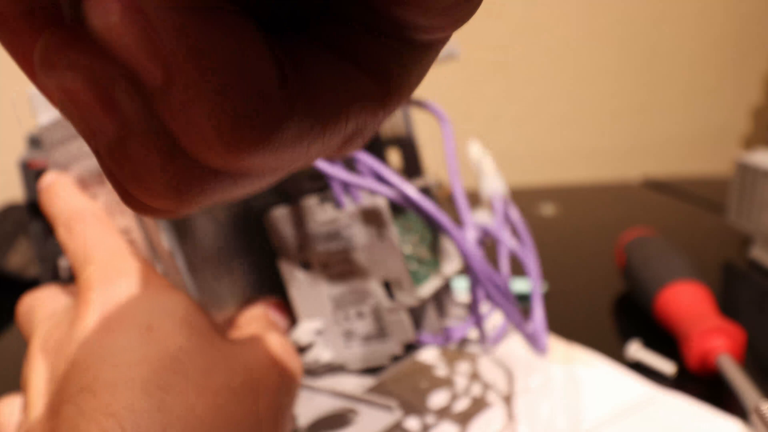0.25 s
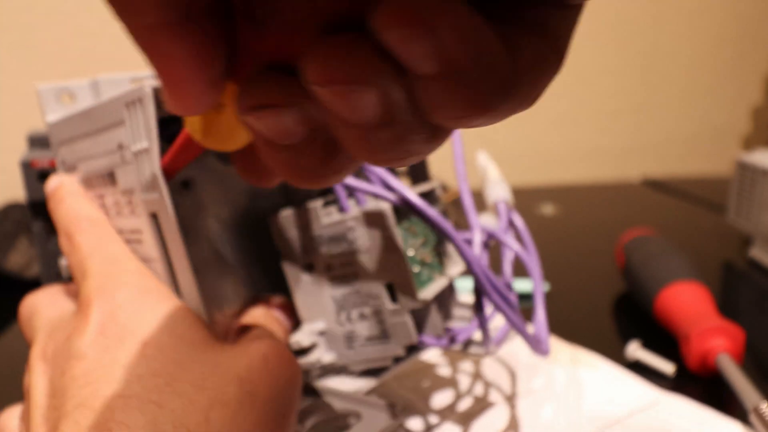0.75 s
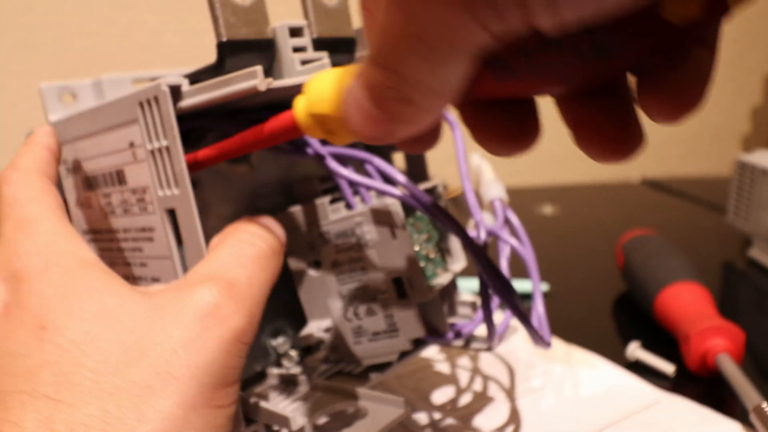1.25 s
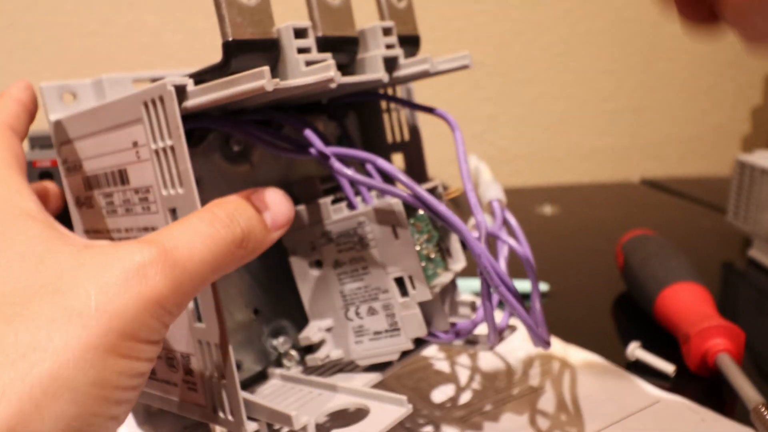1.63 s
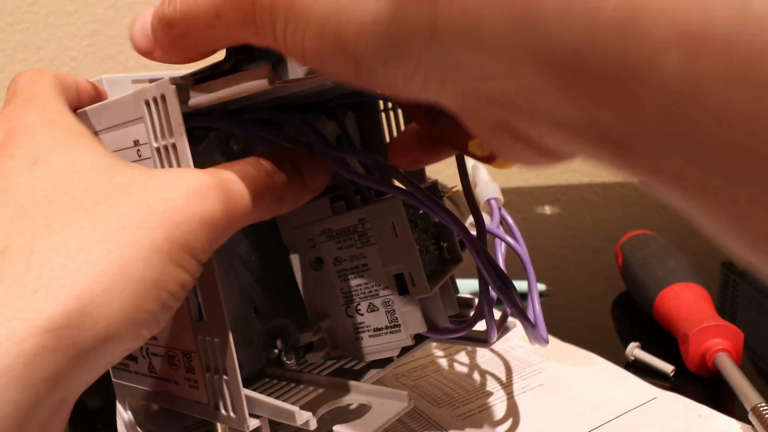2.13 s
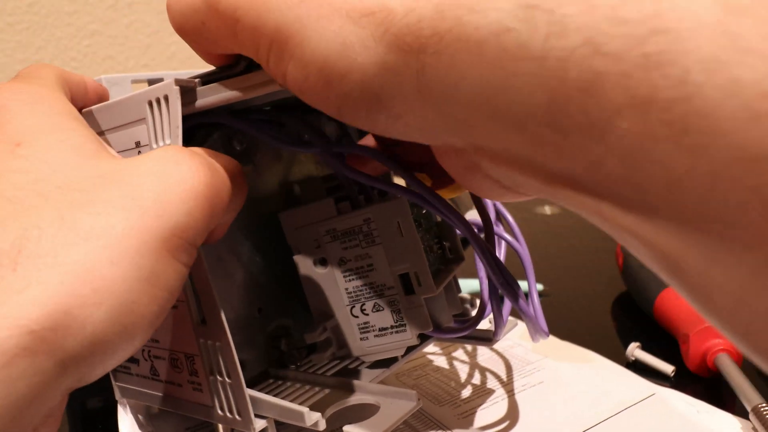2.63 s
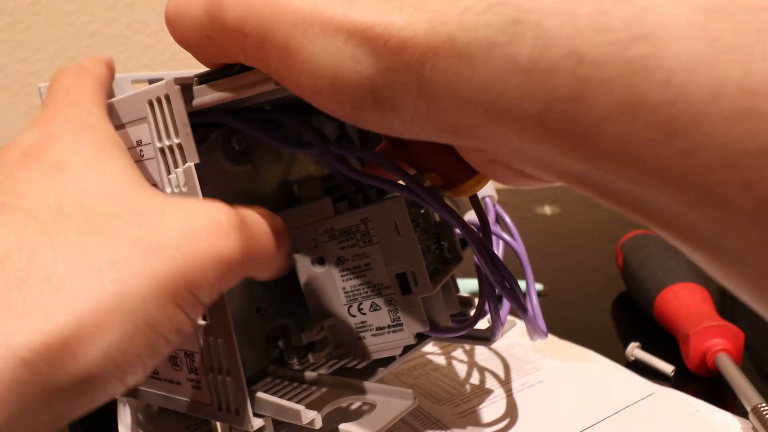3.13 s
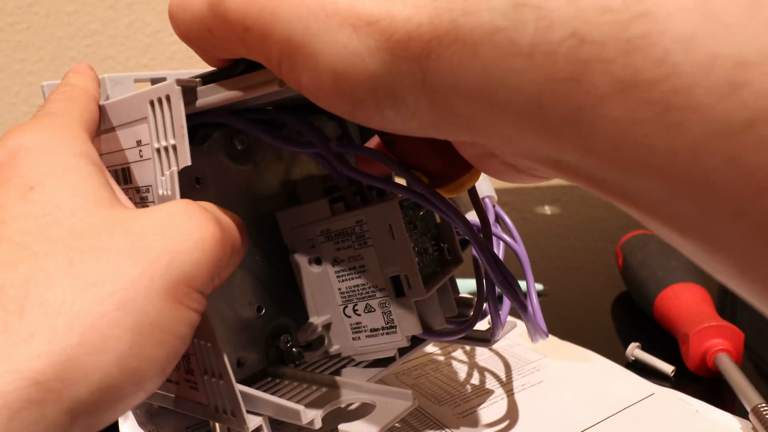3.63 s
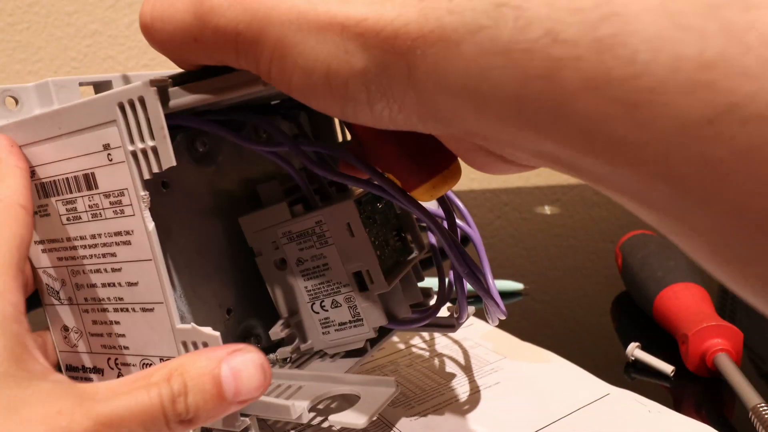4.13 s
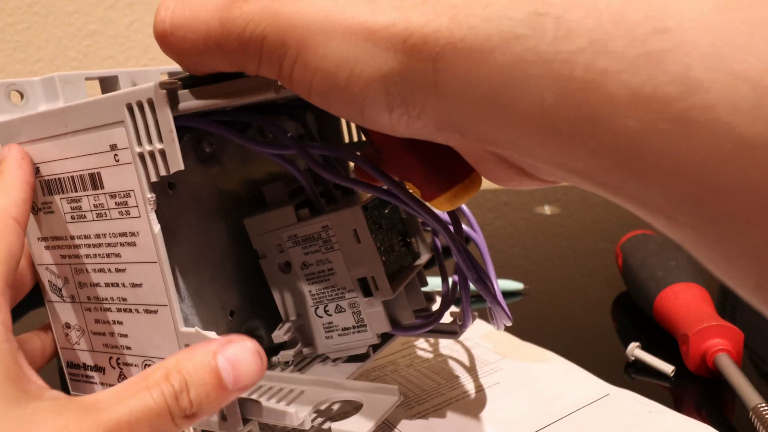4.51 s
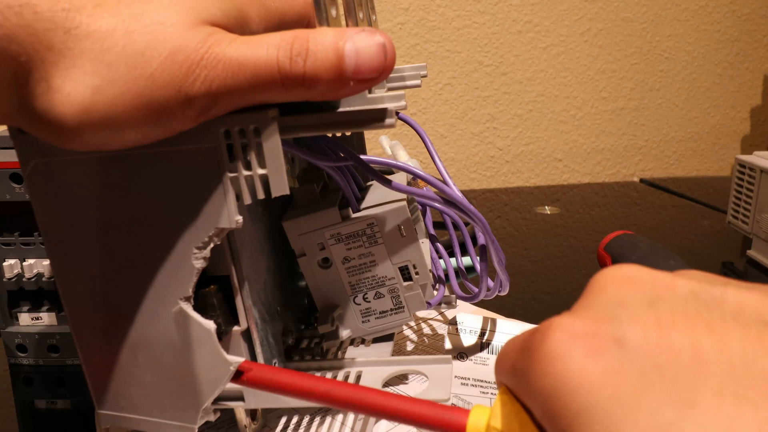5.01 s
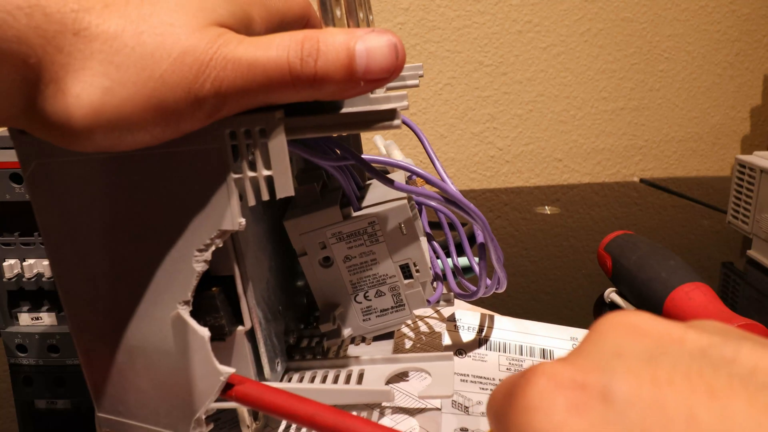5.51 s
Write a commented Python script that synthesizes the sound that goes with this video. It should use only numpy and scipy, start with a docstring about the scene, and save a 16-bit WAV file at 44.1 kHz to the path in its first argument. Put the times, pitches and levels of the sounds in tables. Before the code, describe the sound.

Close clicks and light knocks on a plastic shell, broken by four overloaded snaps, in a small quiet room with faint rumble.

```python
"""A screwdriver pries a hard plastic housing apart on a desk in a small, quiet room.
Snaps and taps are noise sprays coloured by the shell; four snaps overload the microphone and fill the room.
Blows leave panels, desk top and steel shaft ringing as fading modes; hands rub the shell as grainy noise.
Behind them lie the room's echo tail, steady room tone, a wandering bass rumble and a faint hum."""
import sys
import numpy as np
from scipy import signal
from scipy.fft import rfft, irfft
from scipy.io import wavfile
from scipy.ndimage import uniform_filter1d

SR = 44100
rng = np.random.default_rng(int(sys.argv[2]) if len(sys.argv) > 2 else 0)


def to_wav(sig):
    """Store sig (one row per channel, or 1-D mono) as 16-bit WAV at the path in sys.argv[1].

    Samples outside -1..1 are clipped; the rate is SR.
    """
    pcm = np.clip(np.atleast_2d(sig), -1, 1) * 32767
    pcm = np.round(pcm).astype(np.int16)
    wavfile.write(sys.argv[1], SR, pcm.T)  # frames by channels


N = 254016
TIME = np.arange(N) / SR
RESPONSE_HZ = np.arange(1025) * SR / 2048  # frequency grid of the struck sounds


def undb(db):
    """Turns dB into an amplitude factor."""
    return 10 ** (np.asarray(db) / 20)


def unit(x):
    """Scales a signal to an rms of 1."""
    return x / np.sqrt(np.mean(x ** 2))


def on_log(hz, table):
    """Reads a (Hz, value) table along log frequency."""
    table_hz, values = np.transpose(table)
    return np.interp(np.log(np.maximum(hz, 1)), np.log(table_hz), values)


def band(x, lo_hz, hi_hz):
    """Keeps the sound between two frequencies."""
    return signal.sosfilt(signal.butter(2, [lo_hz, hi_hz], "bandpass", fs=SR, output="sos"), x)


def mode(x, hz, width_hz):
    """One resonance, gain 1 at its centre."""
    b, a = signal.iirpeak(hz, hz / width_hz, SR)
    return signal.lfilter(b, a, x)


def walk(rate):
    """Random levels held 1 / rate s and slewed twice."""
    hold = int(SR / rate)
    steps = np.repeat(rng.standard_normal(N // hold + 1), hold)
    return 1.3 * uniform_filter1d(uniform_filter1d(steps, hold), hold)[:N]


def convolve(x, h):
    """Plays x through the impulse response h."""
    return signal.fftconvolve(x, h)[:N]


def response(db):
    """Causal impulse response of a dB spectrum, through the folded cepstrum."""
    cepstrum = irfft(db * np.log(10) / 20)
    half = len(cepstrum) // 2
    cepstrum[1:half] *= 2
    cepstrum[half + 1:] = 0
    return irfft(np.exp(rfft(cepstrum)))


# Damped modes of the plastic shell. Each row: frequency in Hz, width in Hz, lift in dB.
SHELL = [(312, 69, 2.5), (807, 120, 3.5), (1036, 120, 3), (1700, 280, 1), (2270, 82, 0.5), (3776, 120, 5),
         (4270, 73, 4.5), (5450, 400, 2), (6610, 1300, 2.5), (8540, 400, 3), (10200, 170, 2)]


def shell_db(hz):
    """Damped modes of the plastic lift a broad clack."""
    return sum(db / (1 + (2 * (hz - f) / w) ** 2) for f, w, db in SHELL)


# Snaps of the housing, right at the microphone. Each row: start in seconds, peak level in dB,
# then bass, low, middle, high and top levels in dB against that peak, break-up t60 in seconds,
# room share in dB, struck spot in Hz.
SNAPS = [(0.348, 6.5, -20.5, -13, -9.5, -1, 4.5, 0.016, -6, 7098),
         (3.829, 4, -18.5, -4.5, -8.5, 0.5, 2, 0.02, -3.5, 7314),
         (3.868, 7, -22.5, -4.5, -4, 1.5, 4.5, 0.015, -5, 1050),
         (5.7562, 1.5, -28, -8, -2, -1, 4.5, 0.03, -4, 3560)]
# Centres of those five ranges [Hz].
RANGES_HZ = [300, 850, 2000, 4200, 8000]
# Roll-off beyond the outer ranges. Each: frequency in Hz, level in dB against the outer range.
BASS_EDGE = (56, -12)
TOP_EDGE = (16000, -20)
TOUCH_LIFT_DB, TOUCH_Q = 11, 16  # the spot that is struck rings louder than the rest
ROOM_SPOT_SHARE = .3  # the room hears little of the struck spot


def blows(table):
    """Each blow is a fading spray of tiny fractures; returns the direct sound and what the room is fed."""
    t = TIME[:4096]
    near, far = np.zeros(N + 8192), np.zeros(N + 8192)
    for s, peak_db, *range_db, t60, room_db, spot_hz in table:
        density = np.array(range_db) - 10 * np.log10(np.array(RANGES_HZ) / 1000)  # range level to dB per Hz
        points = [(BASS_EDGE[0], density[0] + BASS_EDGE[1]),
                  *zip(RANGES_HZ, density),
                  (TOP_EDGE[0], density[-1] + TOP_EDGE[1])]
        spot_db = TOUCH_LIFT_DB / (1 + (2 * TOUCH_Q * (RESPONSE_HZ / spot_hz - 1)) ** 2)
        broad_db = peak_db + on_log(RESPONSE_HZ, points) + shell_db(RESPONSE_HZ)
        broad_db += 10 * np.log10(t60 * SR)  # a longer spray carries more energy
        clack = response(broad_db + spot_db)
        spray = rng.standard_normal(len(t)) * undb(1.2 * rng.standard_exponential(len(t)))
        spray *= 1000. ** (-t / t60) * np.minimum(t / 0.00032, 1)
        i = min(int(s * SR), N - 1)
        near[i:i + len(t)] += signal.fftconvolve(spray / np.linalg.norm(spray), clack)[:len(t)]
        # summed over all directions the fractures blend into one smooth clack
        far[i:i + len(clack)] += response(broad_db + room_db + ROOM_SPOT_SHARE * spot_db)
    return near[:N], far[:N]


# Taps on the housing. Each row: start in seconds, tick peak in dB, thud peak in dB, tick spot in Hz,
# thud spot in Hz, tick brightness in dB per range, thud brightness in dB per range, room share in dB.
TAPS = [(0.2069, -33.5, -32, 4766, 1600, 0.5, 1.5, 0), (0.2234, -40, -43.5, 4760, 1550, -0.5, 1, -4.5),
        (0.6868, -43.5, -53, 2700, 1130, -2.5, 2, -7), (0.7512, -40.5, -42.5, 2640, 1430, -6.5, -2.5, -3),
        (0.7806, -43, -39.5, 7300, 1010, 1, -2, -2), (0.8001, -42.5, -50.5, 5560, 633, 3, -13, 10.5),
        (0.826, -37.5, -34.5, 7450, 1010, 1, -0.5, -3), (0.8555, -37, -29.5, 3610, 1790, 0, -3.5, -4),
        (0.8749, -23.5, -29, 5340, 756, -3.5, -2, 0.5), (0.8844, -28.5, -27, 5500, 883, -2, 0.5, -3.5),
        (1.1012, -50.5, -63, 4240, 1070, 4.5, 1, 9), (1.1313, -51.5, -57, 3600, 1080, 4, 1, -2),
        (1.1882, -29.5, -58, 3050, 1940, -2.5, 0, -4), (1.2724, -55, -49.5, 3610, 791, 0, -2, -1),
        (1.3503, -44, -45, 3610, 807, 0, 0, 1), (1.4217, -44, -47, 2670, 746, 4, -2.5, 6),
        (1.439, -49, -46, 5770, 794, 2, -2.5, 10.5), (1.4714, -46, -40.5, 2710, 832, 1, -2.5, -1),
        (1.4984, -52, -45, 7190, 826, 5, 6, -1), (1.5157, -41, -46.5, 7540, 805, 3.5, 9, -4),
        (1.5319, -37, -43.5, 3900, 1660, 8.5, 6, -5), (1.8394, -74, -45, 2830, 700, 0, -4.5, 12),
        (1.8694, -75, -42, 2540, 1310, 0, -2.5, 11.5), (2.0474, -62, -46.5, 2820, 931, 0, -1.5, 8),
        (2.1241, -22.5, -31.5, 3680, 939, -2.5, -0.5, 0), (2.1384, -33, -34, 3700, 1100, 0.5, 1.5, 1.5),
        (2.2268, -26.5, -38, 3684, 767, -7, -5.5, 0), (2.3111, -47, -60, 6130, 773, 2, 2, -2),
        (2.38, -29, -36, 3640, 1690, -1, 0.5, -1.5), (2.3984, -40.5, -42, 2960, 627, 4, 4, -4),
        (2.4369, -46, -55, 3630, 762, 6, 3, -8), (2.448, -45, -52, 2910, 1430, 6, -6, -2),
        (2.5047, -32, -52, 7270, 856, 6.5, 3, -7.5), (2.7097, -50, -61, 5200, 1040, 0, -1, 10),
        (2.7218, -46, -55, 5540, 1070, 2.5, 0, -6), (2.7911, -46, -51.5, 3570, 1460, -1, 0.5, 6),
        (2.811, -42.5, -48.5, 2500, 732, 3, 5.5, -4), (2.9123, -49, -46, 2970, 797, 2, -1, 0),
        (2.9614, -32, -39, 2860, 1640, 0.5, -1.5, -1.5), (2.9677, -21.5, -30.5, 2680, 805, 3, 1.5, -1.5),
        (3.0076, -7.5, -37, 5700, 1880, -1, 0, -1.5), (3.0204, -20, -40, 4310, 1650, -0.5, 0.5, -1),
        (3.0854, -33, -47, 4800, 799, 0.5, 0, -2), (3.2296, -33.5, -47, 2730, 794, -4, 0, -1.5),
        (3.2829, -39.5, -51.5, 7050, 872, -0.5, 2.5, -2.5),
        (3.3333, -42.5, -56.5, 4170, 1730, 1.5, 0.5, -1), (3.3528, -45, -52.5, 2940, 1120, 1, 0, -2),
        (3.4176, -46.5, -57.5, 3044, 791, 2.5, 0.5, -1), (3.6192, -48.5, -50, 3030, 1420, -2, 1, -1.5),
        (3.7419, -37.5, -49, 3610, 1550, -0.5, 0.5, -2.5), (3.8984, -13, -18.5, 3704, 1610, 0.5, 0, -3.5),
        (3.9874, -22, -20, 3710, 1250, 6, 0, 8.5), (4.0158, -19.5, -23.5, 4980, 921, 5, -2.5, 2.5),
        (4.0442, -12.5, -28, 3470, 985, 0, -0.5, 2), (4.0724, -18.5, -35, 5870, 980, 1.5, -3, 3),
        (4.607, -51, -54.5, 2510, 657, 0.5, -2.5, 3), (4.6947, -50.5, -69, 5820, 880, 0.5, -2, 1),
        (4.7571, -33, -45, 3700, 794, 2, -2.5, -1.5), (4.7924, -45, -47, 2870, 1240, -6, -7, -12.5),
        (4.8484, -66, -50.5, 3790, 853, 0, 0, -14), (4.8793, -44.5, -64, 3530, 600, -1.5, 0, 2),
        (5.011, -50, -65, 4400, 875, 5.5, 2, 4.5), (5.0439, -42.5, -52, 5330, 2020, 6, 4, 2),
        (5.0544, -41, -50, 5400, 665, 7.5, -3, -4), (5.1248, -50.5, -61, 4370, 633, 0, -3, 2),
        (5.1452, -40.5, -54, 2430, 624, -2.5, -11, -3), (5.2714, -50, -71, 4330, 600, 0, 2, 8.5),
        (5.4251, -36.5, -61.5, 5380, 1080, 0, -1, -1.5), (5.4755, -45.5, -75, 4730, 716, 0.5, 0, -13),
        (5.6834, -51.5, -60.5, 3550, 713, 2, 0, 1), (5.696, -57, -58, 6150, 743, 0, -2.5, 1)]
# Colour of the two parts of a tap, the edge ticks and the body thuds: one level in dB for each range.
TICK_DB = [-22.5, -17.5, -7.5, -1.5, -4]
THUD_DB = [-10.5, -3.5, -1.5, -17, -34.5]
TICK_T60_S, THUD_T60_S = .018, .05
TICK_FALL_DB_PER_OCTAVE = 4  # a tick's colour falls away from its spot
FAINT_PER_S, FAINT_TOP_DB, FAINT_SPREAD_DB = 5.7, -57, 3  # small ticks at random moments


def taps():
    """A tap is a tick plus a thud, given as rows for blows(); faint taps fall at random moments."""
    faint = []
    for when, loudness, pitch in rng.random((int(FAINT_PER_S * N / SR), 3)):
        tick_db = FAINT_TOP_DB + FAINT_SPREAD_DB * np.log(loudness)
        faint.append((when * N / SR, tick_db, FAINT_TOP_DB - 8, 2500 * 3.2 ** pitch, 900, 0, 0, -3))
    rows, step = [], np.arange(5)
    for s, tick_db, thud_db, tick_hz, thud_hz, tick_bright_db, thud_bright_db, room_db in TAPS + faint:
        hump_db = -TICK_FALL_DB_PER_OCTAVE * abs(np.log2(np.array(RANGES_HZ) / tick_hz))
        tick_colour = TICK_DB + hump_db + tick_bright_db * (step - 3)
        thud_colour = THUD_DB + thud_bright_db * (step - 1)
        rows.append((s, tick_db, *tick_colour, TICK_T60_S, room_db, tick_hz))
        rows.append((s, thud_db, *thud_colour, THUD_T60_S, room_db, thud_hz))
    return rows


def ring_modes(strikes, modes, swell_s):
    """Close clusters of modes blur into a rough, fading tone; those near the struck spot sound."""
    t, out = TIME[:SR], np.zeros(N + SR)
    for hz, mode_db, t60 in modes:
        tone = mode(rng.standard_normal(N + SR), hz, 8 + hz / 28)
        fade = 1000. ** (-t / t60) * (1 - np.exp(-t / swell_s))
        for s, spot_hz, reach, db in strikes:
            i = int(s * SR)
            nearness = np.exp(-.5 * (np.log2(hz / spot_hz) / reach) ** 2)
            out[i:i + SR] += undb(db + mode_db) * nearness * fade * unit(tone[i:i + SR])
    return out[:N]


# Blows that leave a panel ringing. Each row: start in seconds, struck spot in Hz, reach in octaves,
# rms level in dB before the fade.
RINGS = [(.352, 1100, .08, -28.5), (.755, 1420, .08, -43), (1.84, 1420, .08, -47), (1.85, 2000, .1, -50),
         (2.503, 7200, .1, -52), (.876, 2260, .08, -40), (1.19, 1950, .08, -50), (1.352, 820, .1, -47.5),
         (1.473, 820, .1, -47), (2.13, 1080, .1, -50), (2.967, 860, .15, -27), (3.832, 1630, .08, -22),
         (3.871, 1000, .15, -27), (3.872, 1750, .3, -21), (3.875, 3620, .1, -24)]
# Modes of the housing panels. Each row: frequency in Hz, level in dB, t60 in seconds.
PANEL = [(820, 0, .12), (1110, 0, .52), (1420, 0, .5), (1630, 0, .25), (1980, 0, .25), (2260, 0, .3),
         (3620, 0, .55), (7200, 0, .33)]


def panels():
    """The housing panels ring on after a blow, swelling almost at once."""
    return ring_modes(RINGS, PANEL, swell_s=.002)


# The housing bumps the desk top. Each row: start in seconds, struck spot in Hz, reach in octaves,
# rms level in dB before the swell and fade.
BUMPS = [(.36, 60, .3, -39.5), (.881, 121.7, .3, -45.5), (2.179, 60, .3, -46.5), (3.983, 260, .3, -27),
         (3.992, 78, 0.51, -31.5)]
# Modes of the desk top. Each row: frequency in Hz, level in dB, t60 in seconds.
DESK = [(60, 1.5, 0.33), (124, -3, 0.62), (252, 15.5, 0.2)]


def desk():
    """The desk top booms under the housing, swelling slowly."""
    return ring_modes(BUMPS, DESK, swell_s=0.065)


# Knocks on the screwdriver's shaft. Each row: start in seconds, level in dB.
STEEL_HITS = [(.207, -51), (1.532, -66), (2.124, -60)]
# Modes of the steel shaft. Each row: frequency in Hz, level in dB against the knock, t60 in seconds.
SHAFT = [(2191, 0, .5), (3682, -7, .3), (4759, -1, .3), (7133, -8, .2)]


def shaft():
    """The steel shaft rings with thin modes that waver in the hand."""
    t, struck = TIME[:SR // 2], np.zeros(N)
    for s, db in STEEL_HITS:
        struck[int(s * SR)] = undb(db)
    out = np.zeros(N)
    for hz, db, t60 in SHAFT:
        ring = undb(db) * np.sin(2 * np.pi * hz * t) * 1000. ** (-t / t60)
        out += convolve(struck, ring) * undb(3 * walk(40))
    return out


def slide(start_s, length_s):
    """Level of one slide: rise, hold, fade."""
    t = TIME - start_s
    attack_s, t60_s = .03, .45
    return np.clip(t / attack_s, 0, 1) * 1000. ** (-np.maximum(t - length_s, 0) / t60_s)


# Hands slide on the plastic. Each row: start in seconds, length in seconds, level in dB,
# treble in dB against that level.
DRAGS = [(.74, .14, -55, -12), (1.2, .2, -72, 1), (1.43, .11, -61, -10), (1.6, .2, -80, 4.5),
         (1.84, .03, -61.5, -64), (2.05, .05, -64, -52), (2.12, .25, -64.5, -27), (2.41, .07, -60.5, -18.5),
         (2.6, .15, -73, -1.5), (3.33, .12, -70, -5), (3.7, .1, -73.5, -6.5), (4.75, .12, -68, -12),
         (5.03, .12, -72, 0), (5.4, .1, -73, -3.5), (5.68, .1, -74.5, -12)]
# Bands of skin hiss that flicker apart. Each row: frequency in Hz, width in Hz, relative level in dB.
HISS = [(4300, 2100, -3), (7200, 1500, 0), (9100, 2800, -1)]
GRIP_DB, GRIP_TREBLE_DB = -79, -8  # the resting grip under the slides; treble against its level


def rubbing():
    """Skin and cable drag on the shell: grainy slips in its modes, with a smoother hiss on top."""
    slips = rng.standard_normal(N) * undb(2.5 * rng.standard_exponential(N) + 2.5 * walk(30))
    slips = convolve(slips, response(shell_db(RESPONSE_HZ)))
    hiss = np.zeros(N)
    for hz, width_hz, db in HISS:
        hiss += mode(rng.standard_normal(N), hz, width_hz) * undb(db + 2.5 * walk(11) + 1.5 * walk(20))
    body_level = undb(GRIP_DB)
    hiss_level = undb(GRIP_DB + GRIP_TREBLE_DB)
    for s, length, db, treble_db in DRAGS:
        body_level = body_level + undb(db) * slide(s, length)
        hiss_level = hiss_level + undb(db + treble_db) * slide(s, length)
    return body_level * unit(band(slips, 220, 2500)) + hiss_level * unit(hiss)


# Fade of the small room. Each row: frequency in Hz, t60 in seconds.
ROOM_T60 = [(100, 0.39), (700, 0.47), (1800, .5), (4800, 0.47), (12000, 0.34)]
# Colour of its echoes. Each row: frequency in Hz, relative level in dB.
ROOM_COLOUR = [(100, 0), (400, -0.5), (1100, 6.5), (2500, -1), (3600, -3), (7000, 0.5), (12000, 3.5)]
ROOM_DB, ROOM_GAP_S, ROOM_BUILD_S = -8, 0.0045, 0.0059  # tail level, silence before it, its rise
LATE_DB, LATE_STRETCH = -14, 1.8  # a weaker, slower fade from the far end of the room


def room(x):
    """Dense echo tail of half-octave noise bands that fade at their own pace."""
    t = TIME[:SR]
    tail = np.zeros(SR)
    for hz in 60 * 2 ** np.arange(0, 8.1, .5):
        noise = mode(rng.standard_normal(SR), hz, hz / 2.5)
        fade = 1000. ** (-t / on_log(hz, ROOM_T60))
        fade = fade + undb(LATE_DB) * fade ** (1 / LATE_STRETCH)
        tail += undb(on_log(hz, ROOM_COLOUR)) * noise * fade
    tail *= np.clip((t - ROOM_GAP_S) / ROOM_BUILD_S, 0, 1)
    return convolve(x, undb(ROOM_DB) * tail / np.linalg.norm(tail))


# Colour of the room tone. Each row: frequency in Hz, relative density in dB per Hz.
HUSH = [(12, -31), (20, -11), (59, 4.5), (148, -11.5), (252, -0.5), (324, -3), (478, -5), (534, -5.5),
        (932, -10), (1340, -13), (1580, -19), (3170, -25), (11700, -30), (15500, -59)]
HUSH_DB = -62.5  # rms level of the room tone
# Hum at the microphone. Each row: frequency in Hz, rms level in dB that it wavers around.
HUM = [(240, -73), (365, -77)]


def hush():
    """Room tone: steady noise, a bass rumble that wanders, a faint wavering hum."""
    hz = np.arange(N // 2 + 1) * SR / N
    spectrum = rfft(rng.standard_normal(N)) * undb(on_log(hz, HUSH))
    rumble = irfft(spectrum * (hz < 180), N) * undb(-walk(0.7))
    steady = irfft(spectrum * (hz >= 180), N)
    hum = np.zeros(N)
    for f, db in HUM:
        hum += undb(db + walk(17)) * np.sqrt(2) * np.sin(2 * np.pi * f * TIME + walk(11))
    return unit(rumble + steady) * undb(HUSH_DB) + hum


def scene():
    """Sums the sources; the room answers the blows and the rubbing."""
    near, far = blows(SNAPS + taps())
    rub = rubbing()
    return (near + panels() + desk() + shaft() + rub + room(far + rub) + hush())[None]


OVERLOAD_TILT, TOP_HZ = 0.15, 15900  # share of the lopsided thump; upper limit of the sound


def record(dry):
    """Overload is lopsided, which leaves a bass thump, then clips flat; the top is cut."""
    swing = np.clip(dry, -5, 5)
    thump = signal.sosfilt(signal.butter(1, 150, fs=SR, output="sos"), swing ** 2)
    held = np.clip(dry + OVERLOAD_TILT * thump, -.95, .95)
    held = signal.sosfilt(signal.butter(1, 15, "highpass", fs=SR, output="sos"), held)
    return signal.sosfilt(signal.ellip(8, .2, 70, TOP_HZ, fs=SR, output="sos"), held)


dry = scene()
out = record(dry)
to_wav(out)
```